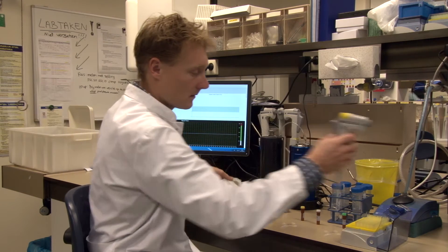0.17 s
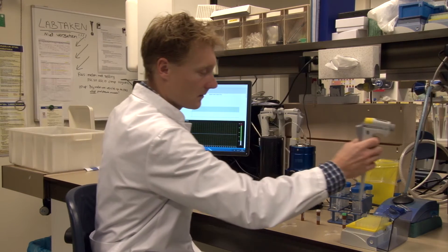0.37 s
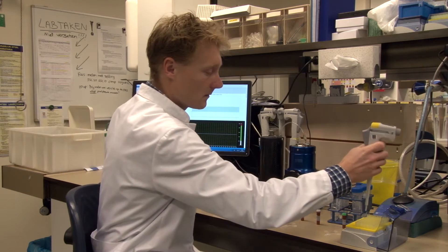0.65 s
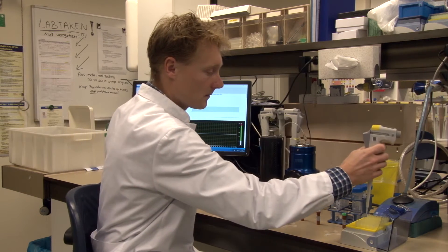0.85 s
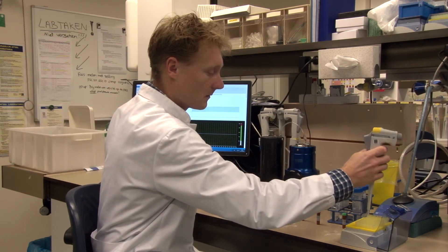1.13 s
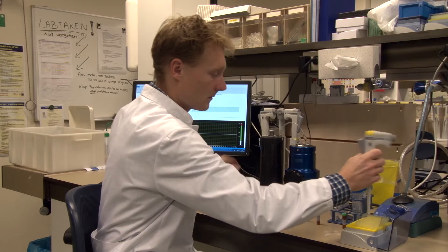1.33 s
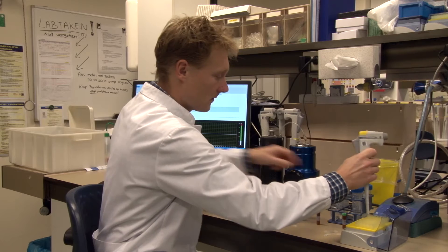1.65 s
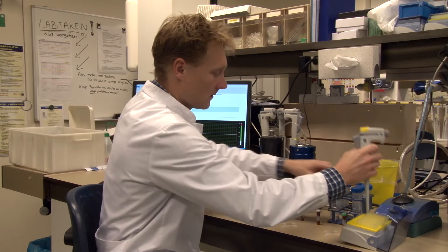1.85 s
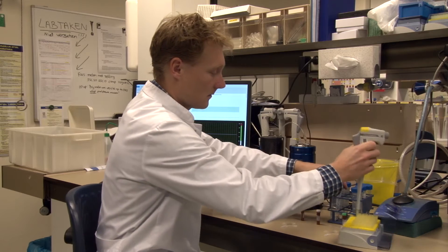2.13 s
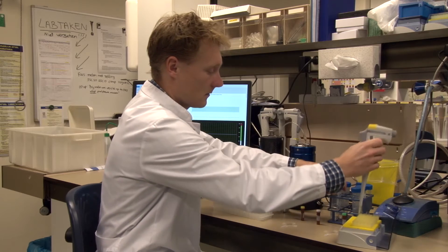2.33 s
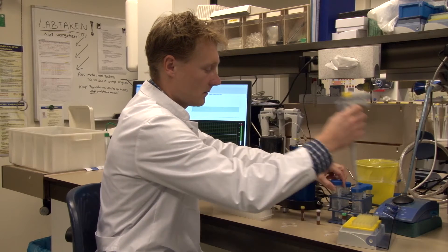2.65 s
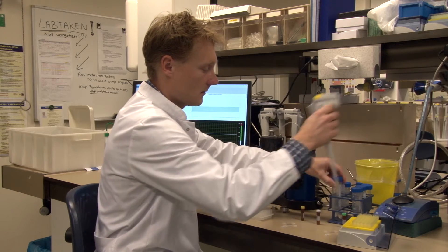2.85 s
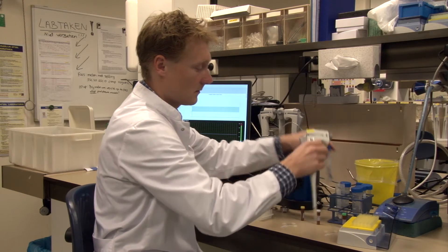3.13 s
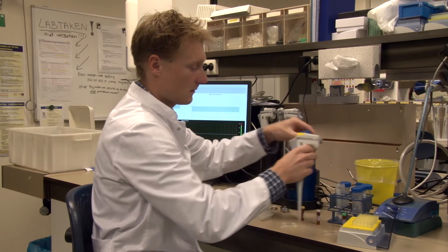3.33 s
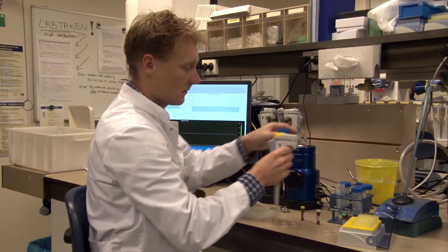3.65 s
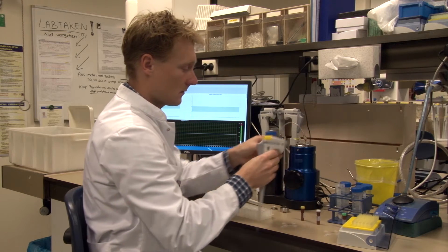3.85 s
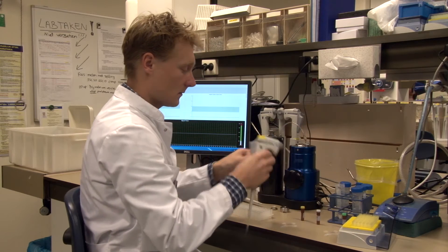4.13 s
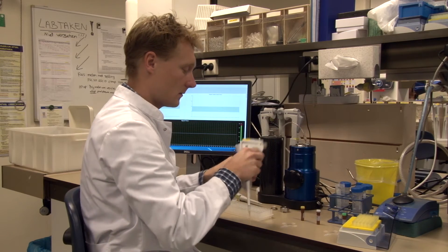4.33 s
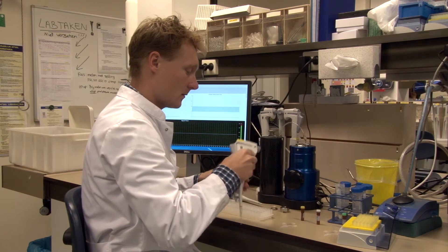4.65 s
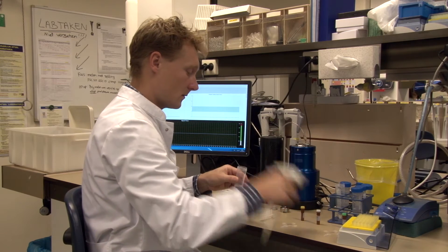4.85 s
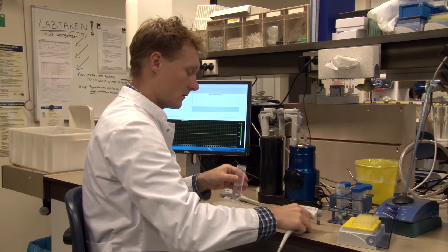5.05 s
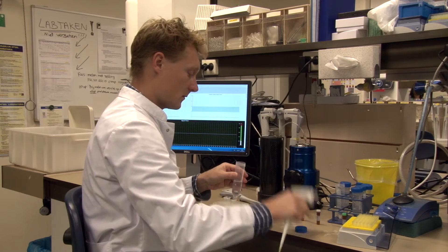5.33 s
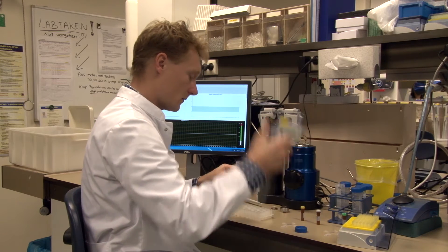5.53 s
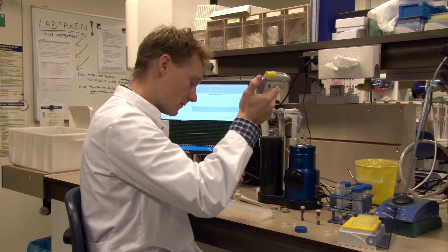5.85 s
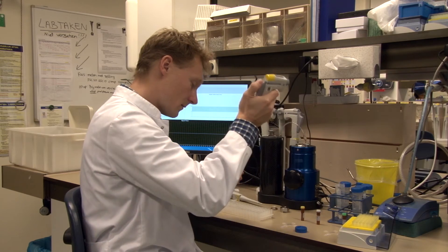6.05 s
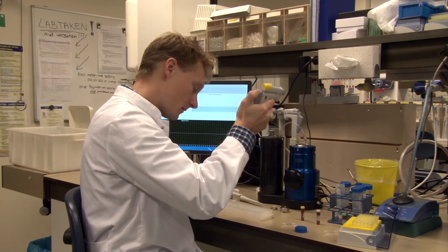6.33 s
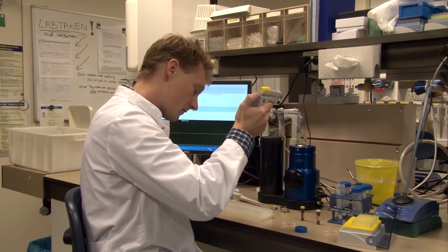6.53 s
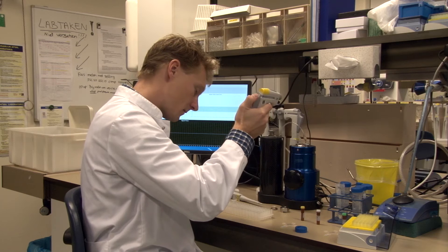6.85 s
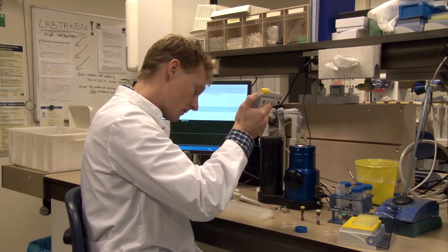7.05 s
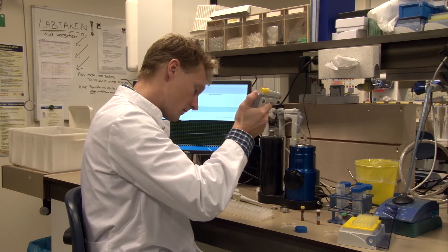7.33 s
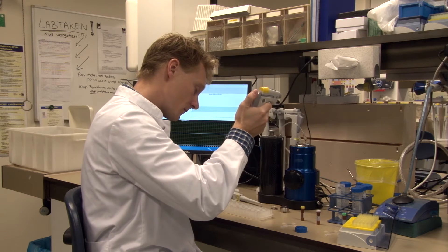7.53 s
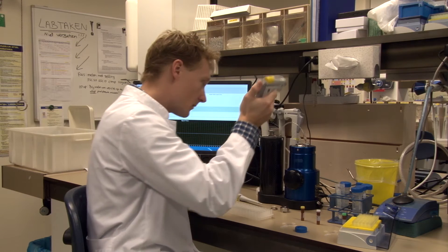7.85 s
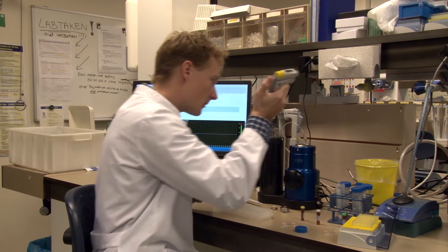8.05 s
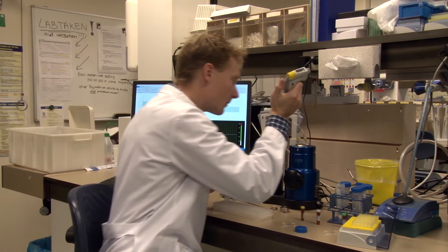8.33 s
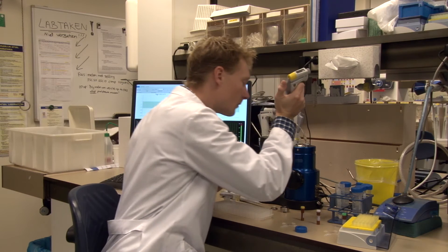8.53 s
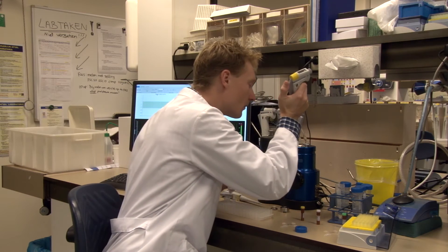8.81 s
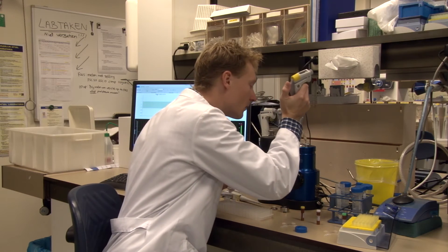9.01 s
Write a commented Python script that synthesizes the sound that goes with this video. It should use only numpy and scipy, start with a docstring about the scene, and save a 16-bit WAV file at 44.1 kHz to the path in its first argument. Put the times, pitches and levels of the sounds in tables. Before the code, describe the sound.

Someone handles a pipette and tubes at a bench, heard close in a short dull room. Faint cloth and ticks, one plastic clunk, light taps, a heavy set-down, a fast burst of rack knocks with chattering tubes, two hollow taps, then fine clicking and scraping. Two bright snaps come close together, followed by a tap, scuff and low thump. The hum sinks slowly, rises once midway, and remains under late coat rustle.

```python
"""Pipette work at a lab bench: clunks, snaps, a set-down, a rattling tube rack, hollow tube taps, coat rustle,
over steady machine hum and air noise, heard a metre or two away by two close microphone ports.
Hits are noise cracks plus decaying modes; scrapes and rattles are runs of random tiny knocks.
Coat, air and rumble are shaped noise; the hum is a stack of wavering sines that sinks and steps up once.
Handling sounds get a short reverberation."""
import sys
import numpy as np
from scipy import signal
from scipy.fft import rfft, irfft, next_fast_len
from scipy.io import wavfile
from scipy.ndimage import uniform_filter1d

SR = 44100
rng = np.random.default_rng(int(sys.argv[2]) if len(sys.argv) > 2 else 0)


def unload_wav(signal):
    """Save mono or channel-first audio to the path in sys.argv[1] as 16-bit WAV at rate SR, clipped to [-1, 1]."""
    wavfile.write(
        sys.argv[1],
        SR,
        np.round(np.clip(np.atleast_2d(signal).T, -1, 1) * 32767).astype(np.int16),
    )


N = 404638
TIME = np.arange(N) / SR
RING = TIME[:SR // 3]  # time base of one short sound, s

# crack spectrum of small plastic parts: f/Hz, relative level/dB
TICK_SPECTRUM = [(300, 5), (1000, 1), (2000, -3), (3700, -4), (5000, -6.5), (7000, -8.5), (10000, -12.5),
                 (15000, -15)]


def undb(db):
    """Decibels to amplitude gain."""
    return 10 ** (np.asarray(db) / 20)


def unit(x):
    """Scale to rms 1."""
    return x / np.sqrt(np.mean(x ** 2))


def burst(x):
    """Scale to the energy of 10 ms at rms 1."""
    return unit(x) * np.sqrt(SR / 100 / x.shape[-1])


def colour(x, points):
    """Causal minimum-phase filter through (f/Hz, gain/dB) points, made by folding the cepstrum."""
    size = next_fast_len(x.shape[-1] // 2 + 1024) * 2
    hz, db = np.transpose(points)
    log_hz = np.log(np.fft.rfftfreq(size, 1 / SR) + 1)  # +1 Hz avoids log(0)
    log_gain = np.log(undb(np.interp(log_hz, np.log(hz), db)))
    cepstrum = irfft(log_gain)[:size // 2]
    cepstrum[1:] *= 2
    response = np.exp(rfft(cepstrum, size))
    return irfft(rfft(x, size) * response)[..., :x.shape[-1]]


def brighten(x, db):
    """Treble shelf from 1.2 to 5 kHz: harder contact lifts the treble."""
    return colour(x, [(1200, 0), (5000, db)])


def walk(rate_hz):
    """Smooth random wandering with a spread near 1."""
    step = int(SR / rate_hz)
    held = np.repeat(rng.standard_normal(N // step + 1), step)
    return 1.232 * uniform_filter1d(held, step)[:N]


def diffuse(size):
    """Noise from all around: the close ports agree in the bass and differ in the treble."""
    mid, side = rng.standard_normal((2, size))
    side = colour(side, [(40, -15), (100, -16), (200, -25), (1000, -22), (3000, -10), (8000, -9), (13000, -8)])
    return np.array([mid + side, mid - side])


def fading(t60_s):
    """Diffuse noise with exponential decay."""
    return diffuse(len(RING)) * undb(-60 * RING / t60_s)


def mode(hz, t60_s):
    """One decaying vibration."""
    return np.sin(2 * np.pi * hz * RING) * undb(-60 * RING / t60_s)


def mode_sum(modes):
    """Sum of an object's modes, alternating in sign."""
    return sum((-1) ** k * undb(db) * mode(hz, t60_s) for k, (hz, db, t60_s) in enumerate(modes))


def add(out, s, sound):
    """Mix a short sound in at time s."""
    start = int(s * SR)
    out[:, start:start + sound.shape[-1]] += sound[:, :N - start]


def random_knocks(rate_per_s):
    """Impulses at random times with random strength and sign."""
    hits = rng.random(len(RING)) < rate_per_s / SR
    return hits * rng.standard_normal(len(RING))


def tick(bright_db, hz, ring_db, tail_db=-5):
    """A small plastic part catches: a short crack, a brief cluster of rings, a faint scatter."""
    scatter = undb(tail_db) * burst(fading(0.08))
    crack = burst(colour(burst(fading(0.019)) + scatter, TICK_SPECTRUM))
    ring = burst(mode(hz, .026) - .5 * mode(hz * 1.09, .02) - .5 * mode(hz * .88, .02))
    return brighten(burst(crack + undb(ring_db) * ring), bright_db)


def strikes(blows, modes, body, modes_db, tail_t60_s, tail_db, tail_bright_db, spot_db):
    """Each blow cracks, rings the modes and scatters off the clutter; spot_db weights the pitch at the spot hit."""
    out = np.zeros((2, N))
    contact = 1 - np.exp(-RING / 0.0011)  # the ring builds up while the contact lasts
    ring = burst(mode_sum(modes) * contact)
    for s, db, bright_db, after_db, crack_t60_s, hz in blows:
        crack = burst(colour(fading(crack_t60_s), body))
        tail = burst(colour(fading(tail_t60_s) * (1 - np.exp(-RING / 0.004)), body))
        after = undb(modes_db) * ring + undb(tail_db) * brighten(tail, tail_bright_db)
        spot = [(hz / np.sqrt(2), 0), (hz, spot_db), (hz * np.sqrt(2), 0)]
        blow = colour(crack + undb(after_db) * after, spot)
        add(out, s, undb(db) * brighten(burst(blow), bright_db))
    return out


def machines(hiss_follow=0.56):
    """A motor hums over weaker fan tones and moving air; all share one level curve, the hiss following it less."""
    # motor and fan tones: f/Hz, level re hum/dB, waver depth/dB (half as many Hz in pitch)
    tones_table = [(217, 0.47, -0.75), (97.6, -14, 2.5), (118.8, -23, 2.5), (290.6, -24, 1), (381, -24, 1),
                   (434, -24, 1), (581.6, -29, 2), (674, -30.5, 2), (759, -27.5, 2), (898, -38.5, 3),
                   (1106, -32, 2), (1890, -41, 2), (4414, -54, 2), (5383, -54, 1), (10158, -57, -0.5)]
    # ventilation air: f/Hz, relative level/dB
    air_spectrum = [(20, -16.5), (50, -0.5), (72, -7.5), (105, -3), (170, -8), (330, -15), (420, -14),
                    (520, -16), (800, -20), (1150, -24), (1400, -27.5), (2300, -34.5), (3500, -43),
                    (6500, -45.5), (8300, -52), (10000, -46.5), (12500, -52), (14400, -44.5),
                    (15500, -49.5)]
    hum_db, sag_db_per_s, air_db = -45.5, 0.56, -6
    rise_s, rise_length_s, rise_db = 4.89, 0.13, 8
    step = (1 + np.tanh((TIME - rise_s) / (2 * rise_length_s))) / 2
    level_db = hum_db - sag_db_per_s * TIME + rise_db * step
    tones = np.zeros(N)
    for hz, db, waver_db in tones_table:
        gain = undb(db + waver_db * walk(5.5))
        pitch_hz = hz + .5 * waver_db * walk(6)
        tones += gain * np.sin(2 * np.pi * np.cumsum(pitch_hz) / SR)
    air = undb(air_db) * unit(colour(diffuse(N), air_spectrum))
    rush = signal.sosfilt(signal.butter(1, 3000, fs=SR, output="sos"), air)
    hiss = air - rush
    hiss_db = level_db.mean() + hiss_follow * (level_db - level_db.mean())
    hum_and_rush = np.sqrt(2) * tones + rush * undb(0.087 * walk(4.5))
    return undb(level_db) * hum_and_rush + undb(hiss_db) * hiss


def rumble(attack_s=0.037):
    """Deep noise that swells quickly, then fades, holds or slowly grows."""
    # start/s, level/dB, fade/(dB/s) (negative grows)
    swells = [(0, -60.5, 0), (5.66, -42, 49), (6.2, -66, 12), (8.05, -54, -3)]
    # f/Hz, relative level/dB
    spectrum = [(20, -13.5), (35, -17.5), (55, 3), (85, -4.5), (140, 1), (220, -32), (600, -51.5)]
    envelope = np.zeros(N)
    for s, db, fade_db_per_s in swells:
        age = np.maximum(TIME - s, 0)
        envelope += undb(db - fade_db_per_s * age) * (1 - np.exp(-(age / attack_s) ** 2))
    return envelope * unit(colour(diffuse(N), spectrum))


def coat(grain_db=1.0):
    """Cloth slides over cloth in tiny catches, swelling and fading with each arm or body movement."""
    # movements: t/s, half length/s, level/dB, gain of the part above 2.1 kHz/dB
    swishes = [(0.018, 0.42, -59, -8.5), (1.134, 0.087, -56, -24), (1.767, 0.34, -54, -2.5),
               (2.455, 0.15, -62.5, -5), (2.995, 0.07, -77, 16.5), (3.762, 0.35, -70.5, 4.5),
               (4.352, 0.34, -60, -5), (5.702, 0.055, -46.5, -16), (5.834, 0.11, -55.5, -8),
               (8.133, 0.31, -50.5, -6.5), (8.62, 0.17, -54, -8.5)]
    # f/Hz, relative level/dB
    cloth_spectrum = [(100, 0.5), (500, 0.5), (1000, -3.5), (1500, -8.5), (2400, -11.5), (4000, -17),
                      (6500, -17.5), (8300, -23.5), (10300, -18.5), (12500, -26), (15000, -32)]
    catches = undb(grain_db * walk(300) + 1.0 * walk(18))
    rub = unit(colour(diffuse(N) * catches, cloth_spectrum))
    dull = signal.sosfilt(signal.butter(1, 2100, fs=SR, output="sos"), rub)
    out = np.zeros((2, N))
    for s, half_s, db, bright_db in swishes:
        swell = undb(db) * np.exp(-((TIME - s) / half_s) ** 2)
        out += swell * (dull + undb(bright_db) * (rub - dull))
    return out


def ticks():
    """Plastic parts catch, some with a dry crack and some with a clear little ring."""
    # t/s, level/dB, brightness/dB, ring f/Hz, ring re crack/dB
    catches = [(0.092, -56, 0.5, 3780, -29), (.121, -65, -6, 5000, -15), (0.4, -70, 8, 6800, -17),
               (.742, -63, -4, 4950, -19), (1.502, -43, 3.5, 6870, -11), (1.852, -49.5, -5.5, 6700, -10),
               (2.3315, -50.5, -2.5, 6850, -12), (2.405, -59.5, 6, 2970, -6), (2.565, -59, 5, 3700, -27),
               (2.941, -65.5, 3, 3170, -4.5), (3.631, -55.5, -10, 3900, 0), (3.7027, -50, -4.5, 4000, -6),
               (3.7327, -56, -12, 3800, -5), (3.906, -58, -7, 3880, 2), (3.9208, -48, -12, 3880, -14),
               (4.027, -68, -3, 3930, -1), (4.103, -61, -2, 3300, -9), (4.471, -52.5, -9, 4800, -8),
               (4.657, -57, -10, 2800, -3), (4.692, -61, -6, 3100, 11), (5.569, -48.5, 1.5, 5900, -17),
               (5.716, -56.5, 5, 3200, -7), (7.485, -63, -3, 3800, -12)]
    out = np.zeros((2, N))
    for s, db, bright_db, hz, ring_db in catches:
        add(out, s, undb(db) * tick(bright_db, hz, ring_db))
    return out


def hollow_taps(knock_t60_s=0.14, tick_bright_db=-4.5, tick_ring_db=-8.0):
    """A soft touch ticks and rings the air in a tube or bottle, with a dull knock around that pitch."""
    # t/s, level/dB, hollow f/Hz, t60/s, dull knock re air ring/dB, tick level/dB, tick ring f/Hz
    taps = [(.196, -46.5, 820, 0.03, 5, -72, 3120), (1.006, -44, 790, 0.0086, -3, -56, 2830),
            (1.304, -43, 1050, 0.034, -13, -53, 3800), (1.306, -45, 624, 0.018, -4, -68, 3150),
            (2.802, -43.5, 823, 0.14, -19, -56.5, 4440), (2.873, -40, 828, 0.15, -14, -60, 4300),
            (3.005, -48, 419, 0.13, -3, -63, 3860), (4.408, -56, 747, 0.014, -10, -48, 3280),
            (4.657, -52, 780, 0.025, -7, -62, 2800), (4.692, -55, 1120, 0.042, -10, -72, 3120),
            (5.568, -43, 790, 0.038, -16, -48, 3160), (8.639, -51.5, 1430, 0.0036, -14, -54, 2200)]
    out = np.zeros((2, N))
    for s, db, hz, t60_s, knock_db, tick_db, tick_hz in taps:
        air = burst(mode(hz, t60_s) * (1 - np.exp(-RING / 0.005)))
        knock_points = [(hz / 3, -18), (hz, 0), (hz * 2, -18), (hz * 8, -50)]
        knock = burst(colour(fading(knock_t60_s), knock_points))
        hollow = burst(air + undb(knock_db) * knock)
        contact = tick(tick_bright_db, tick_hz, tick_ring_db)
        add(out, s, undb(db) * hollow + undb(tick_db) * contact)
    return out


def pipette_clunk():
    """The pipette clunks: a short crack over quickly damped modes."""
    # t/s, level/dB, brightness/dB, ring and scatter re crack/dB, crack t60/s, favoured f/Hz
    blows = [(.563, -33, 0, 0, 0.014, 450)]
    # f/Hz, level/dB, t60/s
    modes = [(394, -4, 0.092), (500, -8, 0.056), (567, -1, 0.048), (834, -7, 0.061), (973, 0.5, 0.06),
             (2140, -10, 0.04)]
    # f/Hz, relative level/dB
    body = [(120, -11), (450, -3), (1000, 1), (1600, -14.5), (4200, -11.5), (7000, -15), (10000, -19),
            (15000, -24)]
    return strikes(blows, modes, body, modes_db=3.5, tail_t60_s=0.063, tail_db=1.5,
                   tail_bright_db=-9.0, spot_db=6.0)


def scrapes(grain_t60_s=0.014, ring_db=-8, grain_bright_db=-9, catches_per_s=320):
    """Surfaces drag in a run of tiny uneven catches, each a faint crack with a short ring."""
    # t/s, half length/s, level/dB, ring f/Hz
    drags = [(1.015, 0.0066, -53.5, 2850), (1.307, 0.016, -59, 2570), (3.729, .025, -61, 3900),
             (3.758, 0.027, -59.5, 3100), (3.934, .02, -68, 3930), (5.685, 0.025, -58, 2040),
             (5.728, 0.04, -66, 3280)]
    out = np.zeros((2, N))
    age = RING - RING.mean()
    for s, half_s, db, hz in drags:
        catches = random_knocks(catches_per_s)
        crack = burst(brighten(colour(fading(grain_t60_s), TICK_SPECTRUM), grain_bright_db))
        grain = crack + undb(ring_db) * burst(mode(hz, grain_t60_s))
        drag = unit(signal.fftconvolve(grain, catches[None], axes=1)[:, :len(RING)])
        add(out, s - RING.mean(), undb(db) * drag * np.exp(-(age / half_s) ** 2))
    return out


def set_down():
    """Something is set down: cracks over the modes of the bench."""
    # t/s, level/dB, brightness/dB, ring and scatter re crack/dB, crack t60/s,
    # pitch at the spot hit, slightly damped f/Hz
    blows = [(1.5022, -20.5, -15.5, 0.5, 0.013, 930), (1.5115, -37.5, 10, 0, .013, 2200),
             (1.532, -37.5, 4, 2, .02, 620)]
    # f/Hz, level/dB, t60/s
    modes = [(575, -1, 0.074), (607, 3, 0.072), (715, -10, 0.05), (860, 4, 0.023), (1020, 3, 0.05),
             (1095, -4, 0.05), (1290, -6.5, 0.11), (1437, -8, 0.073), (2275, -22, .12)]
    # f/Hz, relative level/dB
    body = [(60, -22), (200, -6), (400, -6), (800, -1), (1400, -5.5), (1700, -9), (3000, -19.5),
            (4500, -30), (7000, -34), (9000, -40), (15000, -46)]
    return strikes(blows, modes, body, modes_db=7.5, tail_t60_s=0.17, tail_db=-1.5,
                   tail_bright_db=11.0, spot_db=-1.5)


def rack_knocks():
    """The plastic tube rack is knocked: cracks over its longer-ringing modes."""
    # t/s, level/dB, brightness/dB, ring and scatter re crack/dB, crack t60/s, favoured f/Hz
    blows = [(1.793, -45, -8, -1, .047, 1000), (1.872, -35, -22, 4, .03, 580),
             (2.0745, -27.5, -7, 0, 0.046, 695), (2.1222, -21, 3, -4, 0.051, 3100),
             (2.1275, -21.5, -1.5, -4, 0.022, 646), (2.1476, -23.5, 4, 4, 0.05, 1080),
             (2.162, -32, -2, -11, .06, 1200), (2.176, -27.5, -3, -3, .05, 960),
             (2.2156, -23.5, -7.5, -7.5, 0.011, 750), (2.229, -37, 15.5, -5, 0.098, 980),
             (2.2735, -31, -4, -2, 0.056, 586)]
    # f/Hz, level/dB, t60/s
    modes = [(428, -19, 0.21), (574, -7.5, 0.4), (615, -1, 0.15), (710, -12, 0.19), (850, -9, 0.09),
             (930, -0.5, 0.073), (990, -4.5, 0.096), (1039, -6, 0.22), (1297, -16, 0.18), (2335, -7, 0.074),
             (2535, -19.5, 0.22), (2980, -3, 0.041), (3610, -14, 0.081), (4210, -7, 0.039),
             (6940, -30, 0.045)]
    # f/Hz, relative level/dB
    body = [(120, -13.5), (280, -6.5), (420, -5.5), (500, -7), (620, -2), (760, -1.5), (1000, 2),
            (1250, -4), (1400, -10), (2000, -13), (2500, -16.5), (4000, -19), (4800, -23), (7000, -24),
            (8000, -36), (9300, -28.5), (11000, -35), (15000, -49)]
    return strikes(blows, modes, body, modes_db=1.5, tail_t60_s=0.23, tail_db=-1.0,
                   tail_bright_db=-4.5, spot_db=7.5)


def scuffs(grain_db=3):
    """Things slide or brush over the bench: uneven catches excite one broad resonance."""
    # t/s, half length/s, level/dB, resonance f/Hz
    slides = [(1.843, 0.044, -48.5, 960), (1.935, 0.14, -53.5, 585), (3.552, 0.026, -52.5, 428),
              (4.06, 0.043, -54.5, 476), (4.573, 0.03, -54, 438), (5.639, 0.01, -49, 680),
              (5.657, 0.014, -40.5, 516), (6.083, 0.045, -49.5, 530)]
    out = np.zeros((2, N))
    age = RING - RING.mean()
    for s, half_s, db, hz in slides:
        catches = diffuse(len(RING)) * undb(grain_db * walk(200.4)[:len(RING)])
        resonance = [(hz / 4, -26), (hz / 1.6, -11), (hz, 0), (hz * 1.5, -13), (hz * 20, -70)]
        rub = unit(colour(catches, resonance))
        add(out, s - RING.mean(), undb(db) * rub * np.exp(-(age / half_s) ** 2))
    return out


def rattles(crack_db=-3, crack_t60_s=0.022, knocks_per_s=270):
    """Jolted tubes chatter in their holes: many tiny uneven knocks that die away."""
    # start/s, level/dB, fade/(dB/s)
    chatters = [(2.148, -40.5, 140.5), (2.228, -47, 167)]
    # loose tubes: f/Hz, level/dB, t60/s
    tube_modes = [(1000, 2, .03), (1640, -3, 0.033), (2510, 0, 0.046), (2810, 0, 0.024), (3500, -3, 0.034),
                  (6460, 1, 0.017), (7000, -2, .015), (9800, -12, .01)]
    crack_points = [(300, 6), (1000, 4), (7000, -8), (10500, -13), (14000, -29)]
    out = np.zeros((2, N))
    ring = burst(mode_sum(tube_modes))
    for s, db, fade_db_per_s in chatters:
        knocks = random_knocks(knocks_per_s)
        crack = burst(colour(fading(crack_t60_s), crack_points))
        knock = ring + undb(crack_db) * crack
        chatter = unit(signal.fftconvolve(knock, knocks[None], axes=1)[:, :len(RING)])
        add(out, s, undb(db - fade_db_per_s * RING) * chatter)
    return out


def pipette_snap():
    """The pipette snaps twice in quick succession: very short cracks over high modes."""
    # t/s, level/dB, brightness/dB, ring and scatter re crack/dB, crack t60/s, favoured f/Hz
    blows = [(5.2321, -31, 1.2, -9.5, 0.0075, 3300), (5.2559, -31, 1.2, 4, 0.017, 3620)]
    # f/Hz, level/dB, t60/s
    modes = [(1166, 9, 0.032), (1700, -10, .09), (2120, 2, 0.06), (2400, -19, .05), (2750, -12, 0.062),
             (3150, -7, 0.04), (3850, -6, 0.054), (3940, -9, 0.105), (3975, -3, .045), (6690, -15, 0.08),
             (6850, -7, .05), (8900, -14, .05)]
    # f/Hz, relative level/dB
    body = [(300, -16), (1100, -8), (1650, -3.5), (2200, 1), (3800, 4), (4600, -14), (7000, -10.5),
            (9000, -16), (15000, -29)]
    return strikes(blows, modes, body, modes_db=-3.5, tail_t60_s=0.16, tail_db=3.5,
                   tail_bright_db=-23, spot_db=4.5)


def room(x, wet_db=-15, t60_s=0.29):
    """The crowded lab answers with a short, dull reverberation: convolution with decaying noise."""
    decay = fading(t60_s) * (1 - np.exp(-RING / 0.0016))
    response = colour(decay, [(800, 6.5), (4000, 1.5), (12000, 0.5)])
    response = unit(response) / np.sqrt(len(RING))  # unit energy per port on average
    return x + undb(wet_db) * signal.fftconvolve(x, response, axes=1)[:, :N]


def scene():
    """Handling sounds in the room, with the coat, rumble and machines added dry."""
    small = ticks() + hollow_taps() + scrapes() + scuffs() + rattles()
    blows = pipette_clunk() + set_down() + rack_knocks() + pipette_snap()
    return room(small + blows) + coat() + rumble() + machines()


def record(dry):
    """The two ports differ in colour and drift out of phase towards the treble; the top is cut."""
    # lag of the right port: f/Hz, phase/rad
    port_phase = [(50, 0), (1000, 0.25), (2700, 0.5), (4500, 1.1), (7000, 1.0), (9700, 1.38), (11500, 2.6),
                  (15500, 3.4)]
    top_hz = 15650
    left = colour(dry[0], [(200, -.2), (700, -1), (1300, -2.5), (2400, 1.4), (4400, 0), (8000, 0), (15000, .3)])
    hz = np.fft.rfftfreq(2 * N, 1 / SR)
    lag_rad = np.interp(hz, *np.transpose(port_phase))
    right = irfft(rfft(dry[1], 2 * N) * np.exp(-1j * lag_rad))[:N]
    low_pass = signal.ellip(8, .2, 70, top_hz, fs=SR, output="sos")
    return signal.sosfilt(low_pass, np.array([left, right]))


dry = scene()
out = record(dry)
unload_wav(out)
```